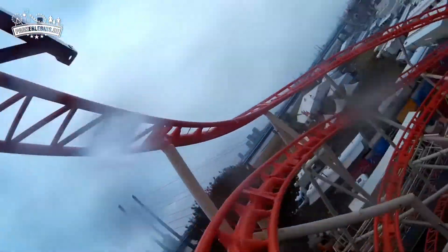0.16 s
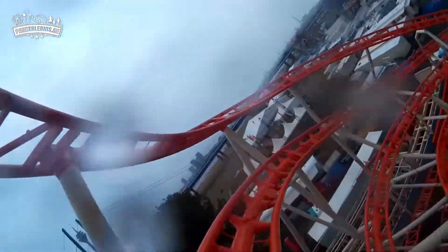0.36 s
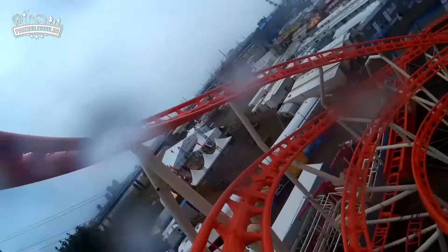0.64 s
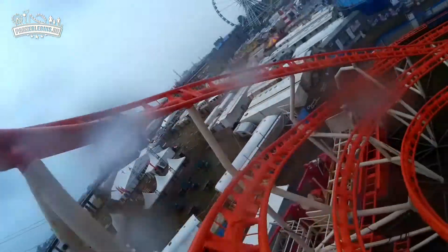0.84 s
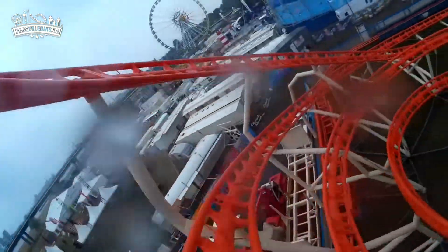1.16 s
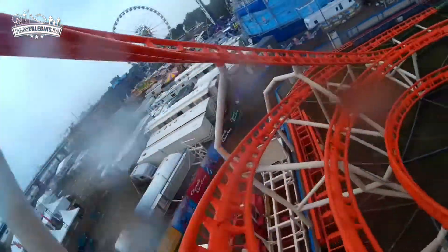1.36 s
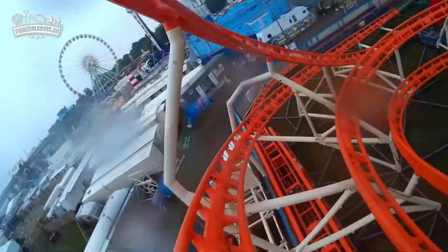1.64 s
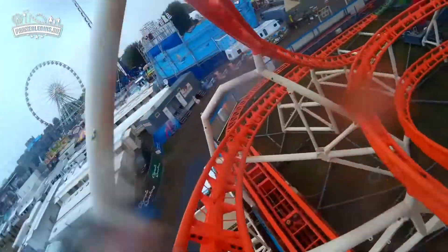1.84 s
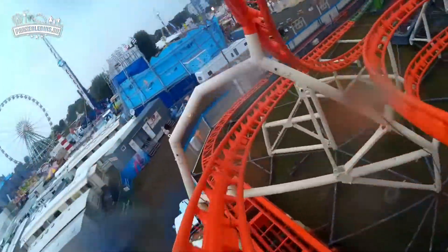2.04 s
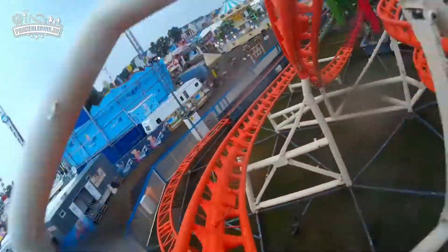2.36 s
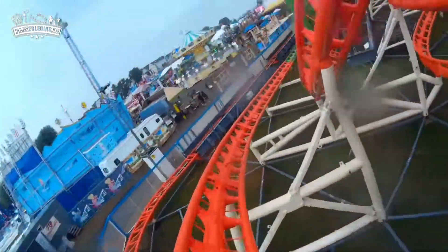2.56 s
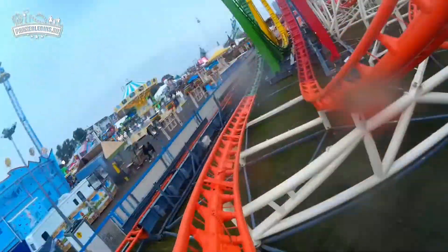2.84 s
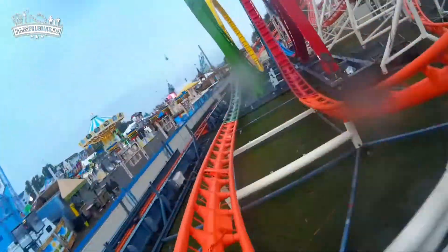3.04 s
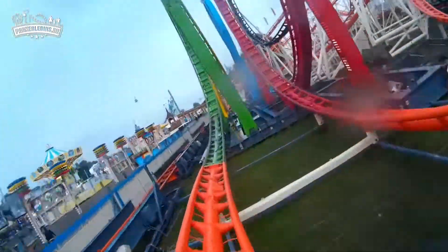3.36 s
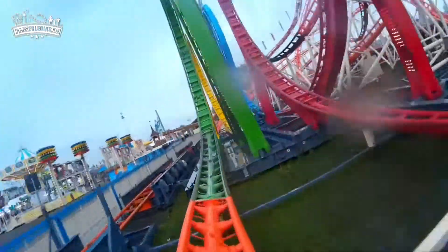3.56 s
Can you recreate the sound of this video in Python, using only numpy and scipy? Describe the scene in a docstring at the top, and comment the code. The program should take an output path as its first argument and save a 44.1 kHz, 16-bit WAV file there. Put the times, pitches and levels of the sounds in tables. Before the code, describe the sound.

A roller coaster car rumbles along its track from the start, heard on board, with low wind gusts buffeting the camera housing. Small sharp ticks and a faint fizzing spray hit the housing throughout. From about 0.5 seconds, dull knocks from the track come irregularly, a strong one near 1.4 seconds. At 3.6 seconds the rumble surges and the hardest jolt lands, slightly overloading the microphone.

```python
"""A roller coaster car sweeps through a banked curve, heard from a small camera housed on board.
From the start, wind buffets the closed housing, the wheels rumble and roar through the car's frame,
and a fine spray and sharp ticks (rattles, perhaps raindrops) ring the housing.
From 0.5 s the track jolts the car with dull knocks. At 3.6 s the rumble surges, then the hardest
jolt lands. The heaviest swings overload the microphone."""
import sys
import numpy as np
from scipy import signal
from scipy.fft import rfft, irfft
from scipy.io import wavfile
from scipy.ndimage import uniform_filter1d

SR = 44100
rng = np.random.default_rng(int(sys.argv[2]) if len(sys.argv) > 2 else 0)


def bounce(signal):
    """Save signal as a 16-bit WAV file at the path given by the first command-line argument."""
    frames = np.transpose(np.atleast_2d(signal))
    limited = np.clip(frames, -1, 1)
    pcm = np.round(limited * 32767).astype(np.int16)
    wavfile.write(sys.argv[1], SR, pcm)


N = 163170  # 3.7 s


def undb(db):
    """Decibels to gain."""
    return 10 ** (np.asarray(db) / 20)


def unit(x):
    """Scale to rms 1."""
    return x / np.sqrt(np.mean(x ** 2))


def curve(rows):
    """Join (seconds, value) rows by straight lines."""
    return np.interp(np.arange(N) / SR, *np.array(rows).T)


def walk(rate_hz):
    """Ramps between random values, rate_hz of them a second; rms 1."""
    hold = max(int(SR / rate_hz), 2)
    steps = rng.standard_normal(4000)[np.arange(N) // hold % 4000]
    return unit(uniform_filter1d(steps, hold))


def noise(spectrum):
    """Noise of rms 1 shaped by (Hz, dB) points, falling 20 dB per octave beyond both ends."""
    hz, db = np.array(spectrum, float).T
    octave = np.log2(np.maximum(np.fft.rfftfreq(N, 1 / SR), 1))
    points = np.log2(hz)
    beyond = abs(octave - np.clip(octave, points[0], points[-1]))
    gain = undb(np.interp(octave, points, db) - 20 * beyond)
    return unit(irfft(rfft(rng.standard_normal(N)) * gain, N))


def steady(x, span_s):
    """Even out swells longer than span_s."""
    width = max(int(span_s * SR), 2)
    power = uniform_filter1d(uniform_filter1d(x ** 2, width), width)
    return x / np.sqrt(power + 1e-12)


def add(out, at_s, sound):
    """Mix a sound in at at_s."""
    start = int(np.clip(at_s * SR, 0, N - 1))
    out[start:start + len(sound)] += sound[:N - start]


def wind():
    """Eddies shove the housing in quick, uneven gusts."""
    # Buffeting spectrum. Each row: frequency in Hz, relative level in dB.
    buffet_spectrum = [(12, -10), (25, -4.5), (125, -1), (170, -6.5), (260, -24), (500, -55)]
    # Buffeting envelope. Each row: time in seconds, level in dB.
    buffet_levels = [(0, -17), (.3, -22), (.42, -16), (.6, -16.5), (.86, -21.5), (1.0, -17), (1.16, -15),
                     (1.24, -18.5), (1.36, -19), (1.44, -12.5), (1.52, -21.5), (1.78, -21), (1.96, -15),
                     (2.12, -10.5), (2.19, -24), (2.32, -21.5), (2.4, -16), (2.63, -18.5), (3.08, -16),
                     (3.27, -18), (3.36, -16), (3.44, -14.5), (3.6, -15.5)]
    gusts = steady(noise(buffet_spectrum), span_s=0.079) * undb(0.91 * walk(rate_hz=27))
    return gusts * undb(curve(buffet_levels))


def wheels():
    """Rolling shakes the frame and roars on the rails; a thin hiss gets through the housing."""
    # Rolling spectra. Each row: frequency in Hz, relative level in dB.
    rumble_spectrum = [(80, -29.5), (160, -2), (270, -0.5), (410, -5.5), (650, -14.5), (850, -24.5),
                       (1200, -35.5), (2500, -65)]
    roar_spectrum = [(300, -7), (600, 12), (850, 9.5), (1050, 0.5), (1300, -10), (1700, -10), (2300, -25.5),
                     (3000, -30)]
    hiss_spectrum = [(1000, 6.5), (1500, 8.5), (2400, 0), (2950, -8.5), (3600, -8.5), (4200, -16.5),
                     (6000, -35.5)]
    # Frame and rail envelopes. Each row: time in seconds, relative level in dB.
    rumble_levels = [(0, -21), (.3, -18), (.45, -16.5), (.66, -16), (.78, -22), (.9, -19), (1.0, -12),
                     (1.08, -14.5), (1.19, -14.5), (1.26, -21.5), (1.44, -16.5), (1.54, -18), (1.68, -15.5),
                     (1.78, -16.5), (1.98, -13.5), (2.14, -16), (2.32, -19.5), (2.4, -15), (2.56, -19),
                     (2.7, -17), (3.26, -17.5), (3.35, -14), (3.54, -17), (3.595, -5), (3.66, -16)]
    roar_levels = [(0, -36), (.5, -38), (.85, -45), (1.0, -30), (1.06, -38.5), (1.36, -45), (1.44, -32.5),
                   (1.52, -42.5), (1.74, -34.5), (1.86, -43), (1.98, -26), (2.04, -37), (2.32, -39),
                   (2.39, -24), (2.46, -38.5), (2.72, -40), (2.78, -26.5), (2.84, -40.5), (3.1, -33),
                   (3.22, -35.5), (3.35, -32), (3.52, -38), (3.6, -38)]
    shudder = walk(rate_hz=60)
    rumble = steady(noise(rumble_spectrum) * undb(2.17 * shudder), span_s=0.095)
    roar = steady(noise(roar_spectrum) * undb(2.4 * shudder), span_s=0.1)
    roar_db = curve(roar_levels)
    hiss_db = -45 + 0.41 * (roar_db - roar_db.mean())
    hiss = noise(hiss_spectrum) * undb(hiss_db + 1.8 * walk(rate_hz=62))
    return rumble * undb(curve(rumble_levels)) + roar * undb(roar_db + 3.5) + hiss


def ring(modes, scatter, rise_cycles=0.41, rebound_s=0.00054, rebound_db=-12):
    """A mode group rings, detuned by where the housing is struck; a softer rebound rings it again."""
    t = np.arange(int(.02 * SR)) / SR
    contact = 0
    for k, ((hz, t60_s, db), detune) in enumerate(zip(modes, scatter)):
        cycles = hz * (1 + 0.13 * detune) * t
        rise = 1 - np.exp(-cycles / rise_cycles)
        decay = undb(db - 60 * t / t60_s)
        contact += (-1) ** k * decay * rise * np.sin(2 * np.pi * cycles)
    delay_s = rebound_s * (1 + 0.32 * scatter[-1])
    tick = contact + undb(rebound_db) * np.interp(t - delay_s, t, contact, left=0)
    return tick / np.sqrt(np.sum(tick ** 2) / (.004 * SR))  # energy of 4 ms at rms 1


def strike_housing(hits, low_t60_s=0.0042):
    """Each hit rings the housing's low, middle and high modes; rows as in ticks()."""
    # Housing modes. Each row: frequency in Hz, T60 in seconds, relative level in dB.
    mid_modes = [(3400, 0.0033, -2.5), (3956, 0.0067, 4), (4720, 0.0033, -3)]
    high_modes = [(5600, 0.0016, -3.5), (7840, 0.0026, -2), (10700, 0.0015, -2)]
    out = np.zeros(N)
    scatters = rng.uniform(-0.54, 1, size=(len(hits), 5))
    for (at_s, *levels_db, low_hz), scatter in zip(hits, scatters):
        groups = ([(low_hz, low_t60_s, 0)], mid_modes, high_modes)
        add(out, at_s, sum(undb(db) * ring(modes, scatter) for modes, db in zip(groups, levels_db)))
    return out


def spray(tick_count):
    """Fine spray on the housing: a grainy fizz and faint ticks that follow its level."""
    # Spray envelope. Each row: time in seconds, level in dB.
    spray_levels = [(0, -61.5), (.45, -64.5), (.6, -69), (1.12, -64), (1.28, -69.5), (3.15, -63),
                    (3.36, -64.5), (3.55, -66.5)]
    # Fizz spectrum. Each row: frequency in Hz, relative level in dB.
    fizz_spectrum = [(3000, 1), (4150, 8), (5000, 3), (6200, -1), (10500, -3), (15000, -4)]
    level_db = curve(spray_levels)
    fizz = noise(fizz_spectrum) * undb(level_db - walk(rate_hz=780))
    starts = rng.integers(0, N, tick_count)
    force_db = 0.5 * rng.standard_normal((tick_count, 1))
    above_fizz_db = rng.normal((7.5, 9.5, 2), 1.3, (tick_count, 3))  # low, middle, high modes
    modes_db = level_db[starts, None] + above_fizz_db + force_db
    low_hz = rng.uniform(1900, 2500, tick_count)
    return fizz + strike_housing(np.column_stack([starts / SR, modes_db, low_hz]))


def ticks(gain_db):
    """Sharp contacts (rattles, perhaps raindrops) ring the housing for a few milliseconds."""
    # Hits on the housing. Each row: start in seconds, relative levels of the low, middle and
    # high modes in dB, low mode frequency in Hz before detuning.
    hits = [(.0735,-48,-47,-51,2400), (.1913,-49,-49,-51,2400), (.2231,-37,-47,-43,2240),
            (.23,-49,-38,-62,2400), (.2413,-35,-32.5,-49,2460), (.3282,-44,-39,-58,2310),
            (.3446,-41,-48,-56,2330), (.4103,-51,-44,-49,2000), (.4345,-45,-55,-37.5,2000),
            (.4791,-44,-48.5,-56,2100), (.5033,-49,-54,-56,2200), (.8757,-35,-44.5,-50.5,2366),
            (1.1168,-19.5,-30.5,-49,1830), (1.1468,-39,-46,-62,2000), (1.1658,-26,-26,-51.5,1840),
            (1.4715,-19.5,-27,-43,1810), (1.6762,-41,-37,-56,2440), (1.7831,-43,-48,-55,2310),
            (1.8922,-39.5,-42.5,-48.5,2270), (2.2289,-31,-30.5,-45.5,2200), (2.6818,-62,-45.5,-53.5,2200),
            (2.7221,-29.5,-35,-56,2300), (2.7304,-40,-44,-57,2300), (2.8469,-62,-53,-51,2180),
            (2.9235,-39.5,-48,-56,2280), (3.153,-26,-34,-40,2390), (3.237,-52,-42.5,-62,2300),
            (3.318,-34.5,-40,-51.5,2400), (3.4448,-24.5,-40,-39,1940), (3.6313,-23,-25,-34,2110)]
    return undb(gain_db) * strike_housing(hits)


def jolts(rise_cycles=0.34):
    """Each jolt from the track swings the frame for a cycle or two."""
    # Track jolts. Each row: start in seconds, envelope peak in dB, pitch in Hz.
    knocks = [(0.524, 0, 131), (0.699, -1.5, 158), (1.024, -1.5, 170), (1.447, 4, 132), (1.672, 0, 287),
              (1.912, -2, 219), (1.973, -3, 111), (2.976, 1.5, 216), (3.305, -3.5, 195), (3.319, 0, 208),
              (3.355, 2, 107), (3.572, -0.5, 250), (3.600, -1, 286), (3.668, 5, 166)]
    out = np.zeros(N)
    t = np.arange(int(.06 * SR)) / SR
    for at_s, peak_db, hz in knocks:
        age = t * hz / rise_cycles
        envelope = undb(peak_db) * (age * np.exp(1 - age)) ** 2
        add(out, at_s, -envelope * np.sin(2 * np.pi * hz * t))
    return out


def scene():
    """All sources at one microphone."""
    mix = wind() + wheels() + spray(tick_count=65) + ticks(gain_db=-1.5) + jolts()
    return mix[None]


def record(dry):
    """The microphone flattens the heaviest swings; a low-pass cuts the top."""
    clip_level, cutoff_hz = .98, 15300
    clipped = dry / (1 + (dry / clip_level) ** 40) ** (1 / 40)
    lowpass = signal.ellip(8, .2, 70, cutoff_hz, fs=SR, output="sos")
    return signal.sosfilt(lowpass, clipped)


dry = scene()
out = record(dry)
bounce(out)
```